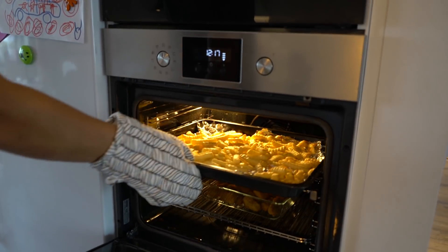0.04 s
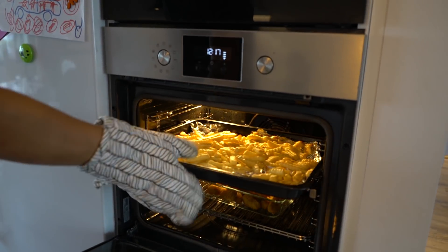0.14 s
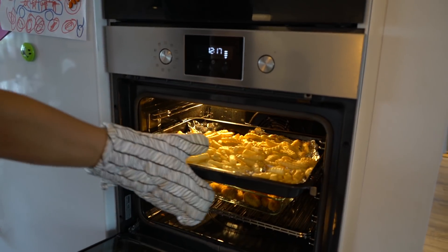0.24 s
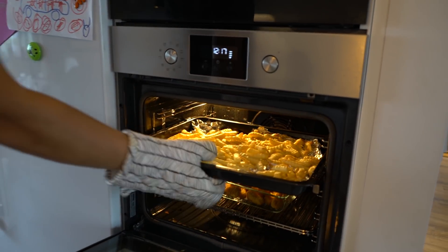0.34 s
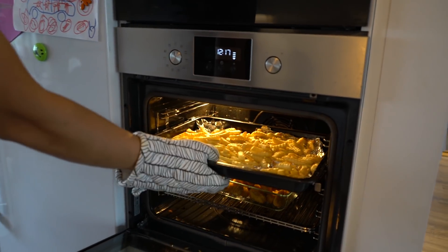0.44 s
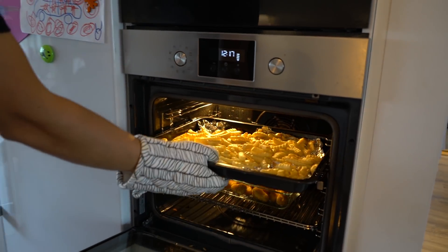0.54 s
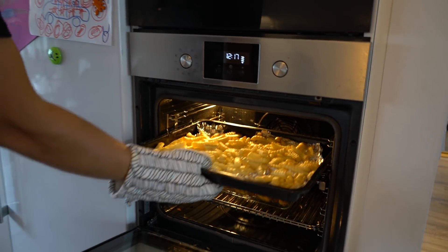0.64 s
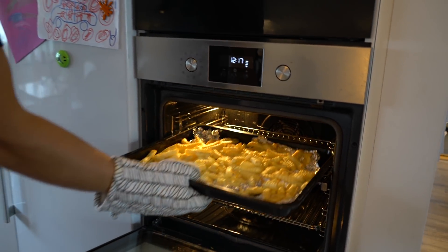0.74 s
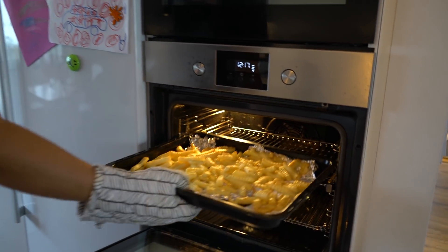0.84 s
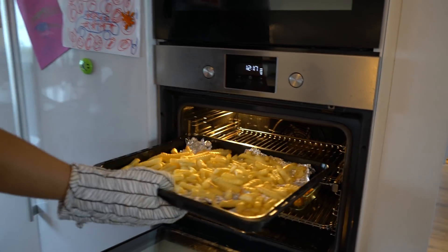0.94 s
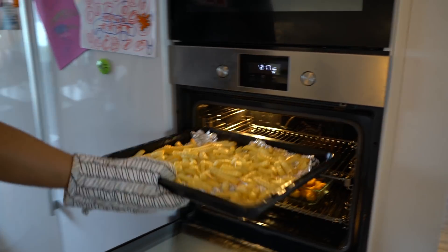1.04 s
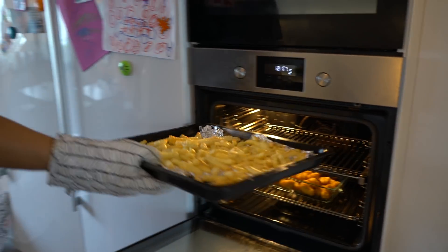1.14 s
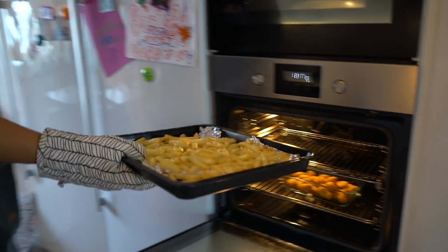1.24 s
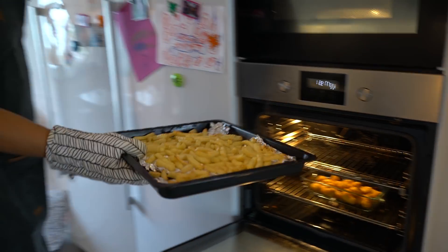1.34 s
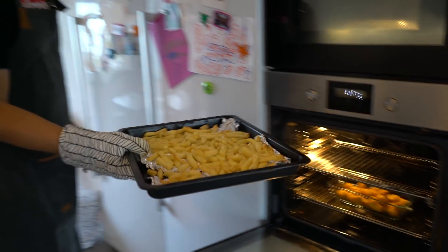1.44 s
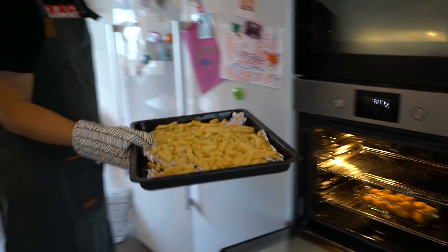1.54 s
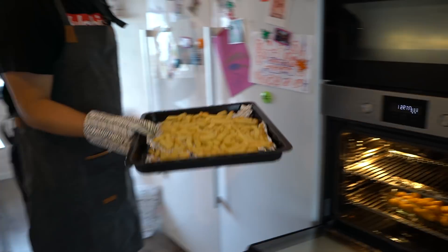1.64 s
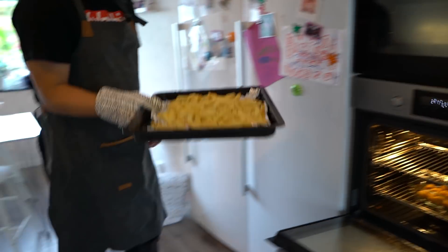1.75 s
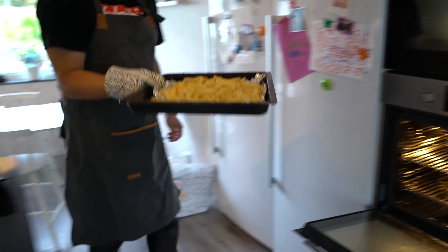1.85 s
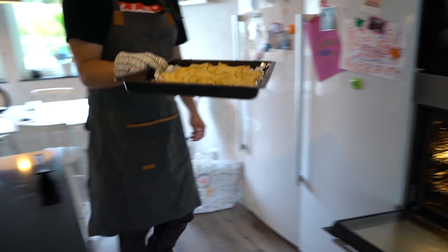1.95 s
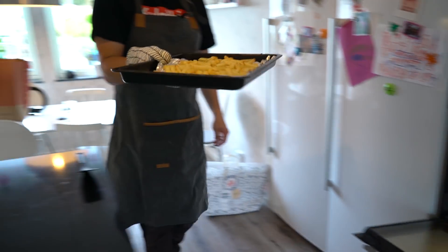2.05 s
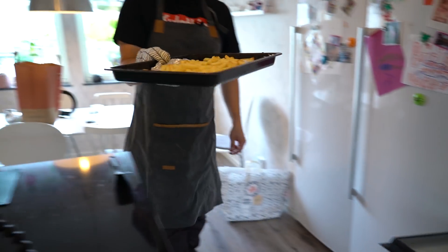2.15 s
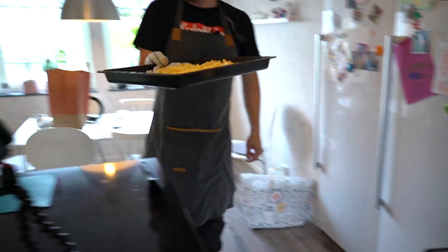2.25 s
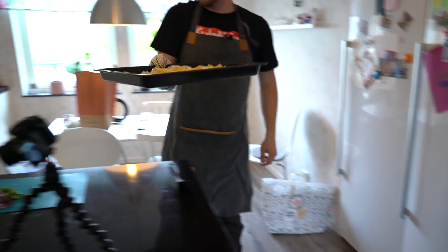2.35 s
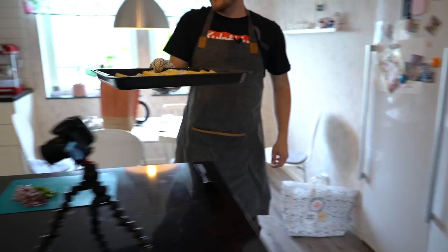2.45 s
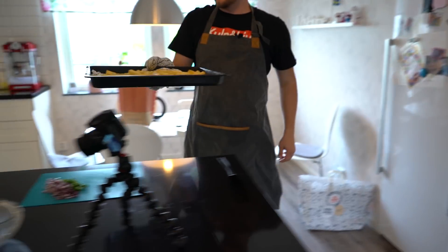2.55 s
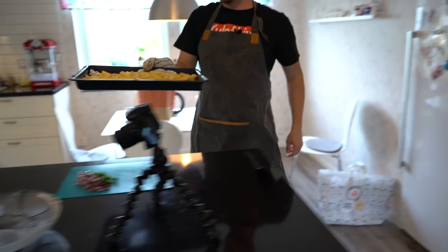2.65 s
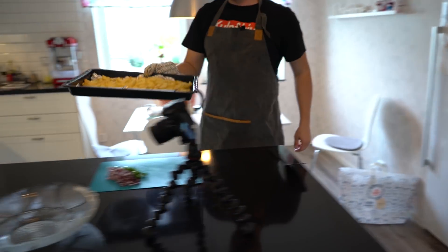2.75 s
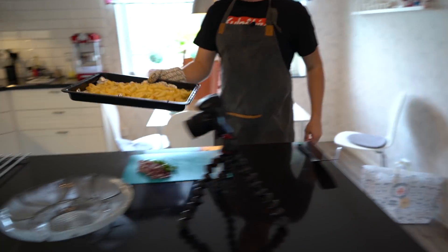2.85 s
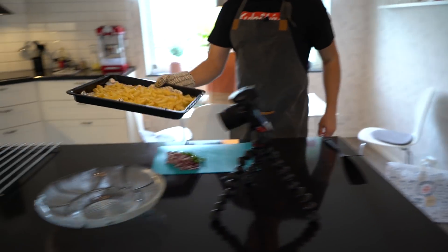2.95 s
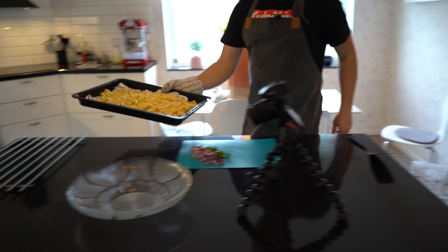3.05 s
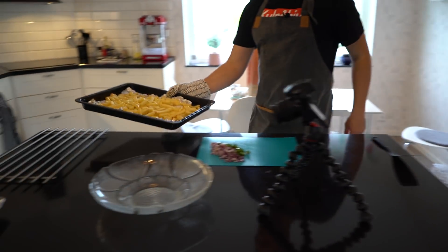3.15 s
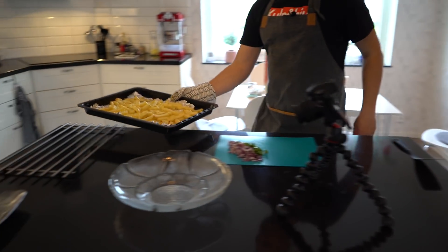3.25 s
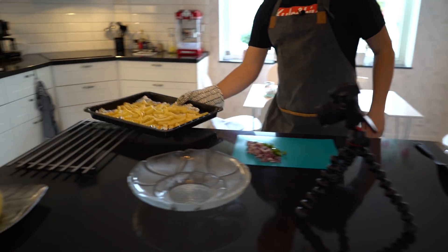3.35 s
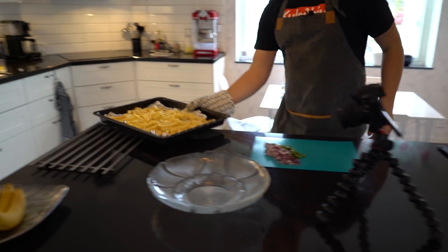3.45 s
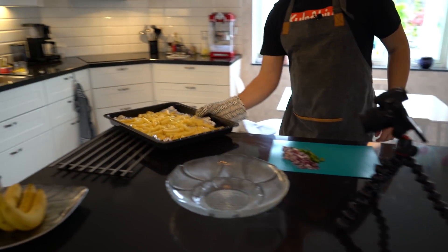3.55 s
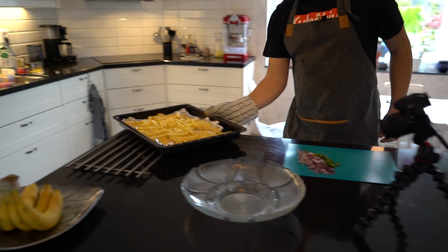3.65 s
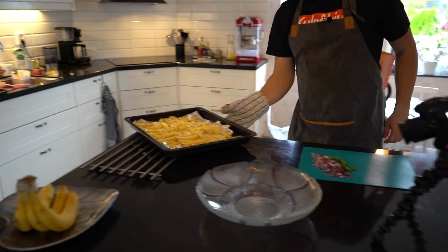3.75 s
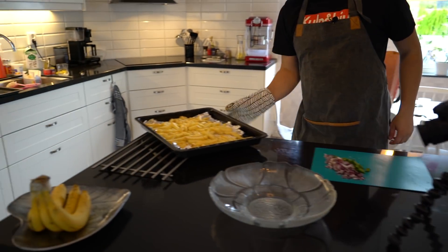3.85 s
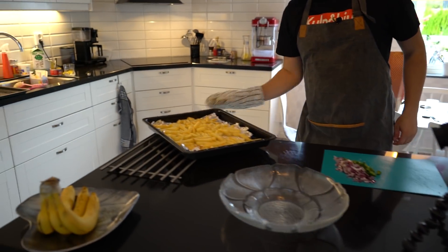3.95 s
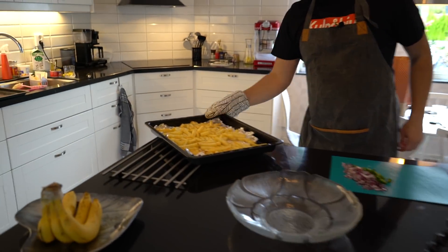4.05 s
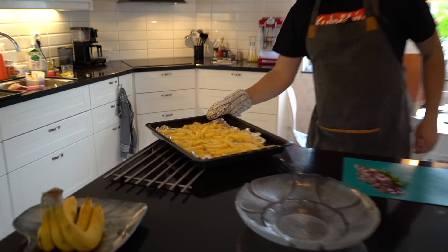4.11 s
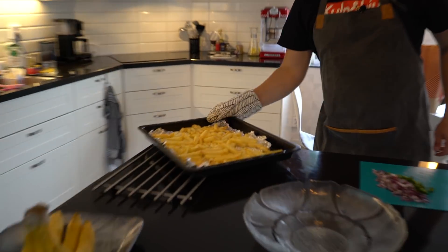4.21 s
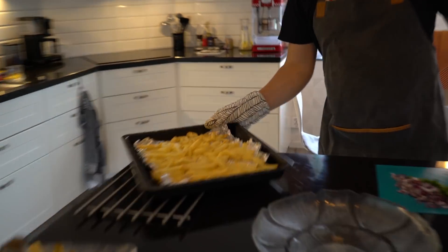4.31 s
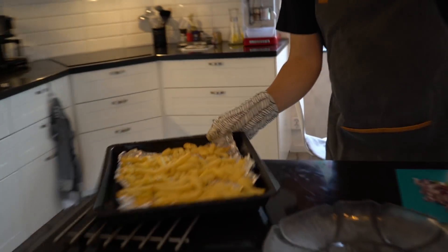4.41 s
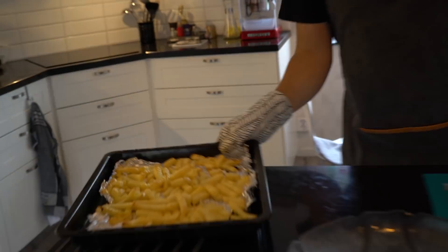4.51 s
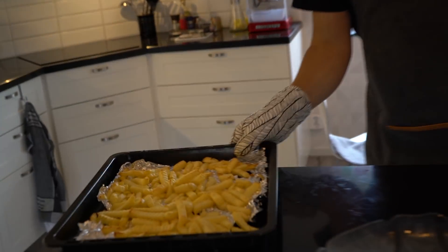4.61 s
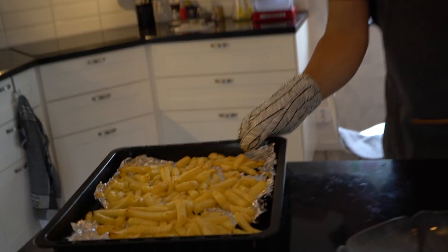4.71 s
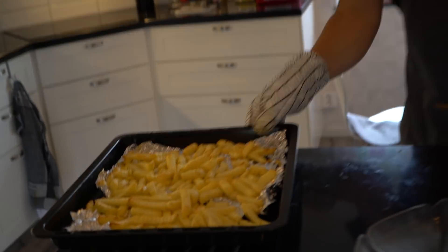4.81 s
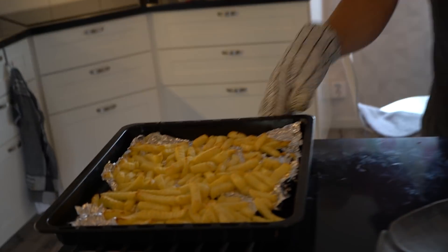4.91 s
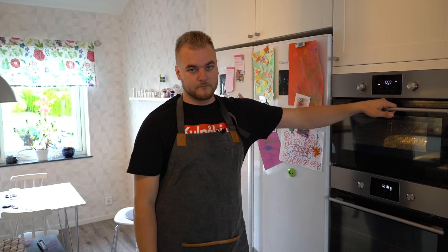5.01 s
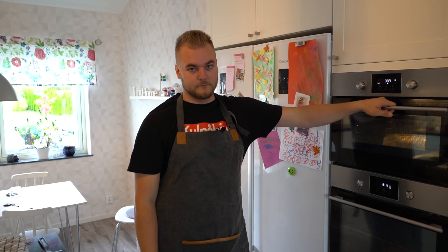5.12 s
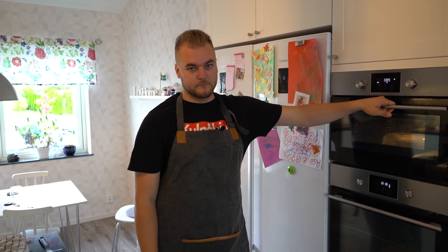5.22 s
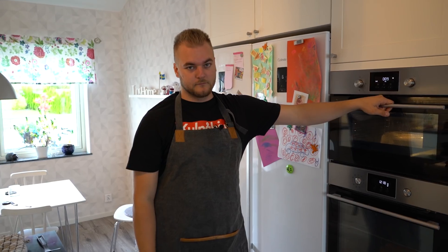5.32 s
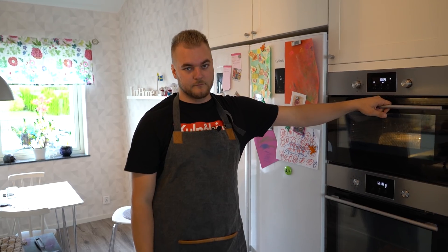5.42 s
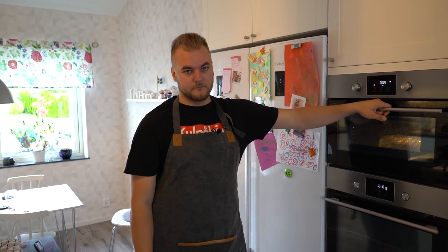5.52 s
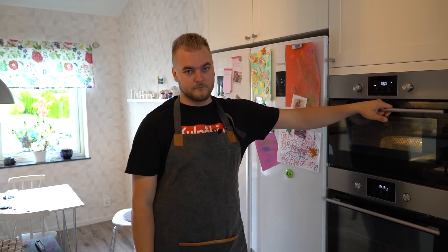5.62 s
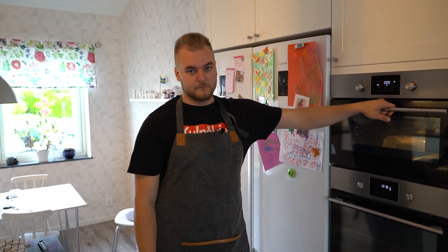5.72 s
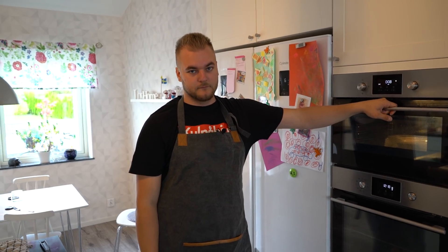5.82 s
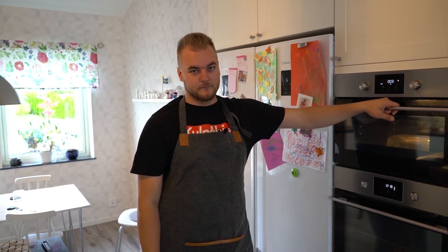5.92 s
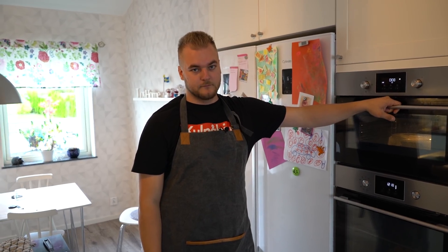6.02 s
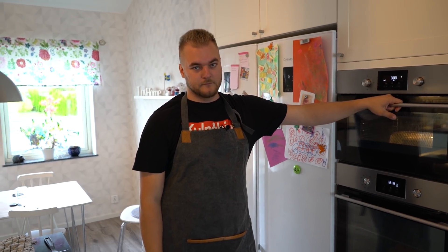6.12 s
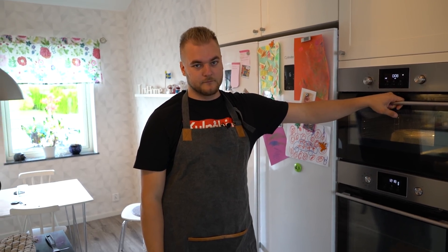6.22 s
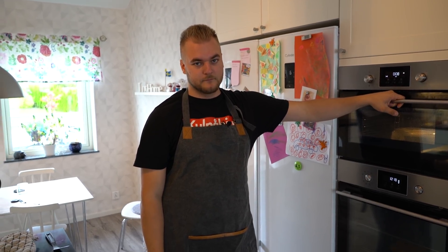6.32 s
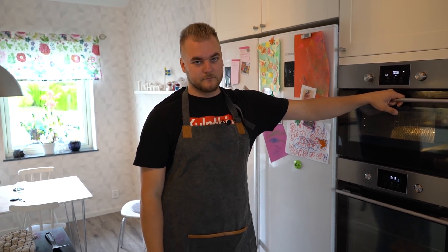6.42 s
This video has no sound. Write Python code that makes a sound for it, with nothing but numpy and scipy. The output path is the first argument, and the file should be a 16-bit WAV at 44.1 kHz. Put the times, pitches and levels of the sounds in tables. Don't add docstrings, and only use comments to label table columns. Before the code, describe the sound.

A close microphone catches quick boomy knocks of a loaded sheet pan on a rack, a rough metallic pull and bright foil snaps. Moving back through a hard-walled kitchen, it hears muted carrying, low floor thuds, then a dry double clatter on a steel trivet, small rattles and short scrapes. The oven drone ends suddenly, replaced by a microwave's plain, buzzing hum and fan air.

```python
import sys
import numpy as np
from scipy import signal
from scipy.fft import rfft, irfft
from scipy.io import wavfile
from scipy.ndimage import uniform_filter1d

SR = 44100
rng = np.random.default_rng(int(sys.argv[2]) if len(sys.argv) > 2 else 0)


def waveform_to_disk(signal):
    frames = np.transpose(np.atleast_2d(signal))
    scaled = np.clip(frames, -1, 1) * 32767
    samples = np.round(scaled).astype(np.int16)
    wavfile.write(sys.argv[1], SR, samples)


def magnitude_from_level(level_db):
    exponent = np.asarray(level_db, float) / 20
    return 10 ** exponent


N = 285282
T = np.arange(N) / SR

# t/s, crack peak level/dB, ring re crack/dB, boom re crack/dB, rattle length/s
RACK_KNOCKS = [
    (0.0, -33.5, 6.5, 9, 0.011),
    (0.087, -15.5, -4.5, -4, 0.028),
    (0.117, -20, -1, 0, 0.012),
    (0.156, -14.5, -6, -7.5, 0.012),
    (0.204, -21.5, -13, -27, 0.0043),
    (0.267, -26, -34, -10, 0.018),
    (0.355, -30, 0, -19.5, 0.022),
    (0.432, -42.5, -11.5, 2, 0.011),
    (0.733, -45, 7, 7.5, 0.014),
    (1.170, -31, 0, -2, 0.0062),
]
TRIVET_KNOCKS = [(3.5482, -12, 6, -22, 0.0027), (3.553, -13, -8, -4, 0.0067), (3.565, -19, 5, -1, 0.0086),
                 (3.611, -23.5, -28, -15, 0.013), (3.627, -28, -5, -2, 0.009),
                 (3.6645, -14.5, -9.5, -9, 0.004), (3.671, -14, -5, 0.5, 0.0088),
                 (3.706, -30, 7.5, -5, 0.013), (3.745, -24.5, -18.5, 8, 0.0059),
                 (3.8705, -23.5, -7, -20, 0.012), (3.912, -27, -8.5, -14, 0.011),
                 (3.922, -30, -8, -9, 0.0048), (3.965, -33, -16, -5, 0.0051),
                 (3.983, -30.5, -14, -3.5, 0.0083), (4.248, -34, 3.5, -24, 0.0061),
                 (4.3035, -32.5, -2, -7, 0.0071), (4.348, -48, -11.5, -13, 0.0069),
                 (4.3915, -22, -4, -3, 0.02), (4.450, -28.5, -9, -33, 0.014),
                 (4.650, -33.5, 3, -32, 0.0096), (4.8005, -41.5, 8.5, -12, 0.013),
                 (5.057, -38.5, 8, -1, 0.012)]
# f/Hz, level/dB, t60/s
RACK_MODES = [(74, -7, 0.5), (83.5, -1, 1), (152, 4.5, 0.35), (210, -2.5, 0.15), (227.3, -2, 0.22),
              (354, -4, 0.16), (413, 0.5, 0.18), (488, 1.5, 0.16), (691, -3, 0.1), (790, 3.5, 0.091),
              (915, 1, 0.12), (1290, -9, 0.028), (1522, -18, 0.041), (1687, -45, 0.058), (2044, -9, 0.035),
              (2180, -3, 0.031), (2350, -14, 0.025), (2530, 5, 0.016), (2860, -5, 0.031), (3190, -5, 0.024),
              (3570, -6.5, 0.022), (4470, -15, 0.023), (6070, -8.5, 0.026), (7040, -10, 0.025),
              (8140, -8, 0.046), (12020, -6, 0.038)]
# f/Hz, level/dB, t60/s
TRIVET_MODES = [(77, -12, 0.53), (126, -22, 0.45), (150.5, -1.5, 0.4), (235.7, -4, 0.2), (347, -1, 0.15),
                (514, -20, 0.1), (597, -7, 0.143), (706, -1.5, 0.11), (743, -0.5, 0.05), (800, 5, 0.029),
                (896, -5.5, 0.17), (972, -8.5, 0.11), (1240, -14, 0.054), (1354, -9.5, 0.077),
                (1510, -4.5, 0.051), (1690, -6.5, 0.1), (2000, -1.5, 0.01), (2150, -9, .06),
                (2300, -12, 0.068), (2625, -6.5, 0.093), (2800, -14.5, 0.071), (3310, -6.5, 0.022),
                (4000, -10, 0.025), (4590, -18, 0.11), (4630, -18, 0.06), (5340, -10, 0.01),
                (6550, -18, 0.055), (7620, -21, 0.079), (8470, -12, 0.12)]
# f/Hz, width/Hz, level/dB
SCRAPE = [(976, 540, -5), (1390, 660, -6), (2340, 830, -4), (3360, 1800, -12.5)]
# f/Hz, width/Hz, level/dB
SQUEAL = [(935, 38, -14.5), (1300, 480, -10.5), (2130, 540, -1), (2760, 1100, -4.5), (4340, 230, -9.5),
          (7400, 850, -7), (8800, 130, -24)]
# from t/s, to t/s
SQUEAL_SPANS = [
    (.8, 1.14),
    (4.44, 4.68),
]
# f/Hz, level per Hz/dB
FOIL = [(900, -26), (1800, 5), (3000, 8), (4300, 9.5), (6600, 10.5), (10400, 9), (13600, 0), (16000, -17)]
# fastest t/s, swell/s, fade/s, scrape level/dB, foil re scrape/dB
OVEN_STROKES = [
    (0.0, .05, 0.05, -33, -16),
    (0.215, 0.18, 0.082, -34, -0.5),
    (0.73, 0.054, 0.36, -33, -32),
    (0.925, .24, 0.14, -28.5, -5.5),
    (1.045, 0.13, 0.11, -33.5, -3.5),
    (1.155, 0.076, 0.077, -41, 8.5),
    (1.295, 0.092, 0.061, -35, 9.5),
    (1.39, 0.27, 0.1, -36, -0.5),
    (1.5, .15, 0.19, -57, 8),
]
CARRY_STROKES = [
    (1.75, 0.37, 0.78, -60, 4.5),
    (2.015, 0.13, 0.22, -52.5, -3),
    (2.18, .07, 0.25, -44.5, -9),
    (2.33, 0.053, 0.067, -49, -12),
    (2.70, 0.22, 0.23, -50.5, -1.5),
    (3.06, 0.21, 0.081, -50.5, -7),
    (3.19, 0.15, 0.13, -38.5, -10.5),
    (3.38, 0.49, 0.14, -48.5, -8.5),
]
TRIVET_STROKES = [
    (3.62, 0.029, 0.29, -23, -22),
    (3.72, 0.099, 0.27, -27.5, -14),
    (3.97, .2, 0.52, -44, -13),
    (4.23, 0.32, .1, -55.5, 5.5),
    (4.252, 0.041, .08, -42.5, -5),
    (4.375, 0.066, 0.067, -51, 12.5),
    (4.41, 0.051, 0.2, -37.5, 7),
    (4.48, 0.15, 0.31, -32, -19),
    (4.6, .15, 0.24, -34, -6),
    (4.87, 0.23, 0.19, -42, -29),
]
# strongest t/s, swell/s, fade/s, level/dB, deep rumble re level/dB
SHUDDERS = [
    (0.14, 0.13, 0.38, -30.5, 2),
    (0.73, 0.099, .2, -38, -0.5),
    (0.93, 0.21, 0.6, -38.5, -12),
    (1.17, 0.083, 0.087, -37.5, -9),
    (1.29, 0.093, 0.23, -38, -8),
    (2.75, 0.16, 0.4, -49, 0),
    (3.70, 0.15, 0.15, -30, 0),
    (3.90, .1, 0.21, -37.5, 3.5),
    (4.395, 0.026, 0.55, -44, -7),
    (5.07, 0.034, 0.036, -62, 16),
]
# t/s, peak level/dB, centre f/Hz
SNAPS = [
    (0.78, -21, 8000),
    (1.046, -21, 7400),
    (1.166, -19, 10700),
    (1.174, -17, 6820),
    (1.215, -22, 7900),
    (1.229, -24, 10600),
    (1.298, -15.5, 7200),
    (3.659, -25, 7500),
]
# t/s, peak level/dB, floor f/Hz
STEPS = [
    (1.98, -38, 21),
    (2.398, -44, 32),
    (2.741, -29, 22),
    (2.916, -30.5, 31),
    (3.275, -29.5, 18),
    (3.376, -32, 25),
    (5.021, -38, 25),
]
# t/s, distance/m
OVEN_DISTANCE = [
    (0.0, 0.32),
    (.9, 0.95),
    (1.6, 0.9),
    (2.27, 1.48),
    (2.6, 2.4),
    (3.3, 2.6),
    (4.2, 2.8),
    (5.08, 3.1),
]
# f/Hz, level per Hz/dB
OVEN_AIR = [(71, -31), (120, -7.5), (153, -8.5), (402, -10), (454, -12), (698, -14), (1030, -21.5),
            (1140, -18.5), (1750, -22.5), (3310, -31.5), (10400, -41), (13900, -38.5), (16000, -54)]
# f/Hz, level per Hz/dB
MICRO_AIR = [(71, -19.5), (120, -7.5), (157, -11.5), (251, -11.5), (301, -9), (630, -16), (698, -19.5),
             (773, -18), (911, -22.5), (988, -23), (1430, -18), (3590, -36), (12000, -43), (16000, -50.5)]
# f/Hz,
# level/dB
MICRO_BUZZ = [(301, -61), (500, -69), (697, -62.5), (899, -66), (1420, -75)]
# band f/Hz, t60/s, level/dB
ROOM = [(293, 0.97, -10.5), (1310, 0.35, -7.5), (3770, 0.42, -9.5), (11100, 0.26, -10)]

CHANGE_S, MAINS_HZ = 5.086, 100.
OVEN_DB, MICRO_DB = -50.5, -49
OVEN_HUM_DB, OVEN_RUMBLE_DB, MICRO_HUM_DB, MICRO_RUMBLE_DB = -42.5, -44.5, -45.5, -49
RACK_RISE, TRIVET_RISE = .24, .03
PUSH_S, PUSH_DB = .0005, -2
STROKE_ROUND, FOIL_REST_DB = 1.27, -60.5
DRUM_DB, DRUM_REST_DB, RATTLE_DB = -1, -49.5, -10.5


def clatter(knocks, modes, rise, crack_db, sheet_db, thud_db, ring_db, boom_db):
    blows = np.zeros((3, N))
    latest = np.zeros(N, int)
    chatter = grit(2.02)
    for k, (s, db, ring, boom, length) in enumerate(knocks):
        i = int(s * SR)
        t = T[:min(N - i, SR // 5)]
        here = slice(i, i + len(t))
        attack = np.minimum(t / max(rise * length, .0001), 1)
        shape = np.exp(-(t / max(length, .002)) ** 1.61) * attack
        blows[:, here] += magnitude_from_level(db + np.array([[0], [ring], [boom]])) * shape * chatter[here]
        push = np.sin(np.pi * np.minimum(t / (PUSH_S + rise * length), 1))
        blows[1, here] -= magnitude_from_level(db + ring + PUSH_DB) * push
        latest[i:] = k
    luck_db = 2.0 * rng.standard_normal((len(knocks), len(modes)))
    free_db = .3 * (np.array(knocks)[:, 1] + 12)
    crack = magnitude_from_level(crack_db) * band(blows[0], 1410, 9260)
    thud = magnitude_from_level(thud_db) * band(band(blows[1], 540, 3350), 540, 3350)
    wobble = [1 + .6 * walk(rate) for rate in (45, 70, 110, 170)]
    rings = np.zeros(N)
    span = slice(int(knocks[0][0] * SR), min(N, int((knocks[-1][0] + 1) * SR)))
    for k, (hz, db, t60) in enumerate(modes):
        part = 2 - np.searchsorted([400, 1800], hz)
        longest = (.06, .09, 1.)[part]
        part_db = (sheet_db, ring_db, boom_db)[part]
        gain = magnitude_from_level(luck_db[:, k] + free_db * (part < 2) + db + part_db)
        drive = band((blows[part] * gain[latest])[span], .7 * hz, 3 * hz)
        rings[span] += wobble[k % 4][span] * mode(drive, hz, min(t60, longest))
    return kitchen(crack + thud + 0.33 * rings) + 0.74 * rings


def rubbing():
    strokes = OVEN_STROKES + CARRY_STROKES + TRIVET_STROKES
    steel = swell(strokes)
    rustle = np.hypot(swell(strokes, share=1), magnitude_from_level(FOIL_REST_DB))
    slips = grit(2.0) * magnitude_from_level(1.2 * walk(120))
    scrape, squeal = resonances(slips, SCRAPE), resonances(slips, SQUEAL)
    speed = 0
    for start, end in SQUEAL_SPANS:
        speed = speed + np.sin(np.pi * np.clip((T - start) / (end - start), 0, 1)) ** .5
    foil = colour(grit(1.8) * magnitude_from_level(1.1 * walk(130)), FOIL)
    drum = band(rng.standard_normal(N), 76, 620)
    resting = magnitude_from_level(DRUM_REST_DB) / curve(OVEN_DISTANCE)[0] ** 0.91
    drumming = np.hypot(magnitude_from_level(DRUM_DB) * swell(SHUDDERS), resting)
    scraping = (scrape + speed * squeal) * steel * magnitude_from_level(-3.5)
    return scraping + level(foil, 0) * rustle + level(drum, -3.1) * drumming


def resonances(slips, table):
    return sum(magnitude_from_level(db) * level(band(slips, hz - width / 2, hz + width / 2), 0) for hz, width, db in table)


def snaps():
    out, t = np.zeros(N), T[:SR // 50]
    for s, db, hz in SNAPS:
        burst = rng.standard_normal(len(t)) * np.exp(-t / 0.0012)
        tick = band(burst, 0.81 * hz, 1.17 * hz)
        out[int(s * SR):][:len(t)] += magnitude_from_level(db) * tick / np.abs(tick).max()
    return out


def steps():
    out, t = np.zeros(N), T[:SR // 8]
    for s, db, hz in STEPS:
        swing = np.sin(2 * np.pi * hz * t) * np.exp(-(t * hz / 1.1) ** 2)
        out[int(s * SR):][:len(t)] += magnitude_from_level(db - 3.5) * swing
    return out


def hum():
    near, shake, after = 1 / curve(OVEN_DISTANCE)[0], swell(SHUDDERS), T > CHANGE_S
    oven_line = np.hypot(magnitude_from_level(OVEN_HUM_DB) * near, magnitude_from_level(RATTLE_DB) * shake)
    line_gain = np.where(after, magnitude_from_level(MICRO_HUM_DB), oven_line)
    fan_gain = np.where(after, magnitude_from_level(MICRO_RUMBLE_DB), magnitude_from_level(OVEN_RUMBLE_DB) * near ** .5)
    rumble_gain = np.hypot(fan_gain, swell(SHUDDERS, share=0.92))
    wave = np.sin(2 * np.pi * MAINS_HZ * T + 0.55 * walk(16))
    line = np.sqrt(2) * line_gain * magnitude_from_level(0.82 * walk(3.18)) * wave
    rumble = level(band(rng.standard_normal(N), 15, 85), 0) * rumble_gain * magnitude_from_level(2.5 * walk(7))
    buzz = 0
    for hz, db in MICRO_BUZZ:
        gain = magnitude_from_level(db + 4.0 + 2.2 * walk(3.8))
        buzz = buzz + gain * np.sin(2 * np.pi * hz * T + 0.78 * walk(5.0))
    return line + rumble + buzz * after


def air(shape, db):
    low, high = (colour(rng.standard_normal(N), shape) for _ in range(2))
    flicker = magnitude_from_level(1.6 * walk(11)) * band(low, 37, 790)
    hiss = signal.sosfilt(signal.butter(2, 900, "high", fs=SR, output="sos"), high)
    noise = flicker + hiss
    return noise * magnitude_from_level(db) / np.std(band(noise, 114, 3300))


def kitchen(x):
    t, tail = T[:SR // 2], 0
    for hz, t60, db in ROOM:
        noise = band(rng.standard_normal(len(t)), hz / 2, hz * 3.1)
        part = noise * 1000 ** (-t / t60) * (t > .006)
        tail = tail + magnitude_from_level(db) * part / np.sqrt(np.sum(part ** 2))
    return x + signal.fftconvolve(x, tail)[:N]


def swell(rows, share=0):
    t, power = T[::32], 0
    for peak_s, rise_s, fall_s, db, more_db in rows:
        late = t - peak_s
        away = np.minimum(np.abs(late) / np.where(late < 0, rise_s, fall_s), 5)
        power = power + magnitude_from_level(db + share * more_db - 20 * away ** STROKE_ROUND) ** 2
    return np.interp(T, t, np.sqrt(power))


def mode(x, hz, t60):
    r = np.exp(-np.log(1000) / (t60 * SR))
    w = 2 * np.pi * hz / SR
    return signal.lfilter([np.sin(w)], [1, -2 * r * np.cos(w), r * r], x)


def grit(spread_db):
    return level(rng.standard_normal(N) * magnitude_from_level(spread_db * rng.exponential(1, N)), 0)


def walk(rate):
    k = int(SR / rate)
    held = np.repeat(rng.standard_normal(N // k + 1), k)
    return 1.3 * uniform_filter1d(uniform_filter1d(held, k), k)[:N]


def level(x, db):
    return x * magnitude_from_level(db) / np.sqrt(np.mean(x ** 2))


def curve(table):
    s, *columns = np.transpose(table)
    return [np.interp(T, s, c) for c in columns]


def colour(x, shape):
    hz, db = np.transpose(shape)
    f = np.maximum(np.arange(N // 2 + 1) * SR / N, 1)
    return irfft(rfft(x) * magnitude_from_level(np.interp(np.log(f), np.log(hz), db)), N)


def band(x, lo_hz, hi_hz):
    return signal.sosfilt(signal.butter(2, [lo_hz, min(hi_hz, .45 * SR)], "band", fs=SR, output="sos"), x)


def scene():
    rack = clatter(RACK_KNOCKS, RACK_MODES, RACK_RISE,
                   crack_db=1.0, sheet_db=-25.0, thud_db=4.5, ring_db=-27.5, boom_db=-30.5)
    trivet = clatter(TRIVET_KNOCKS, TRIVET_MODES, TRIVET_RISE,
                     crack_db=0.5, sheet_db=-25.5, thud_db=5.5, ring_db=-26.5, boom_db=-32)
    before = np.clip((CHANGE_S - T) / 0.0011, 0, 1)
    tray = rack + trivet + kitchen(snaps()) + rubbing()
    oven = tray + steps() + air(OVEN_AIR, OVEN_DB + 1)
    microwave = air(MICRO_AIR, MICRO_DB)
    return (before * oven + (1 - before) * microwave + hum())[None]


def low_pass(x):
    return signal.sosfilt(signal.butter(12, 15830, fs=SR, output="sos"), x)


def record(dry):
    soft = np.tanh(0.59 * dry) / 0.6
    top_cut = signal.ellip(8, .2, 60, 15750, fs=SR, output="sos")
    return low_pass(signal.sosfilt(top_cut, soft))


dry = scene()
out = record(dry)
waveform_to_disk(out)
```